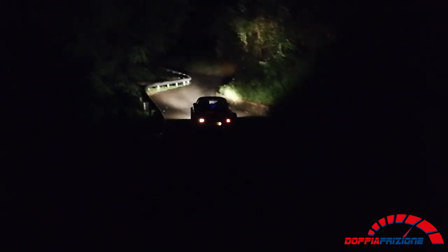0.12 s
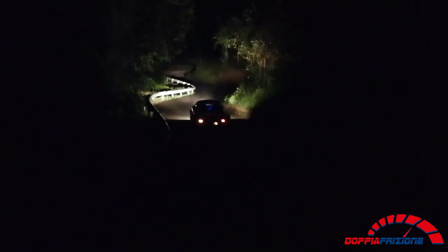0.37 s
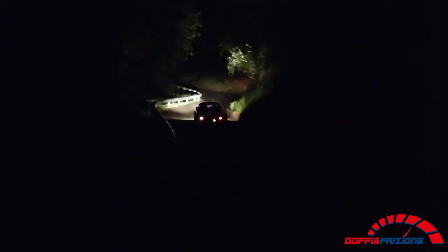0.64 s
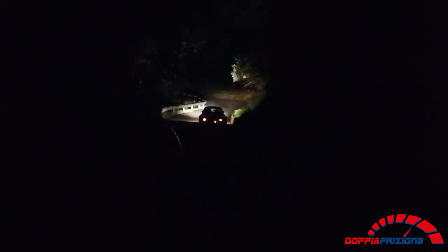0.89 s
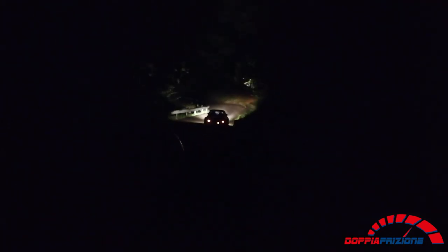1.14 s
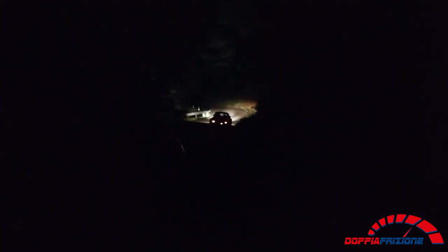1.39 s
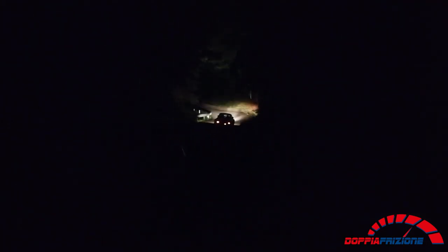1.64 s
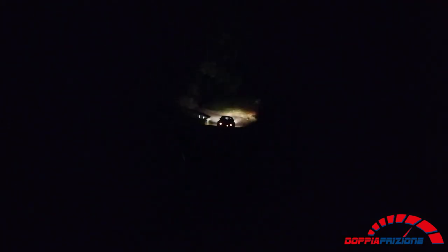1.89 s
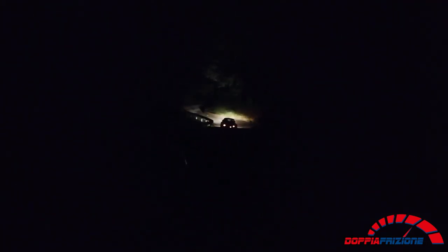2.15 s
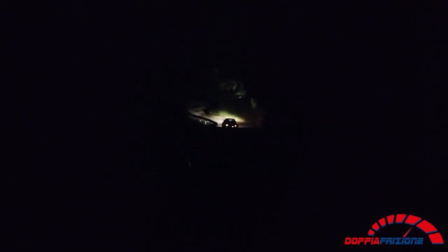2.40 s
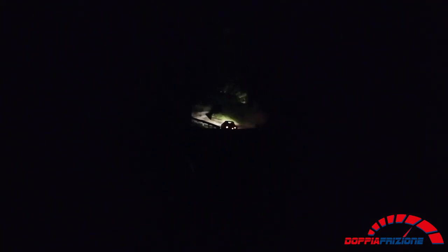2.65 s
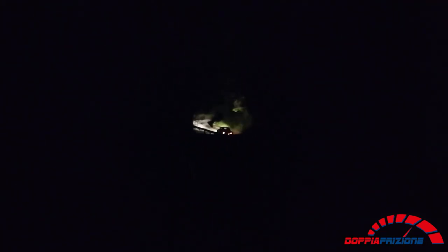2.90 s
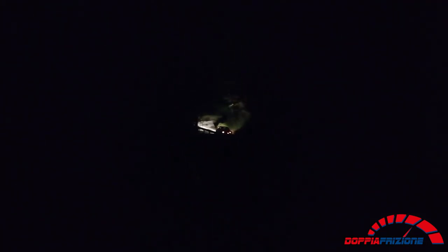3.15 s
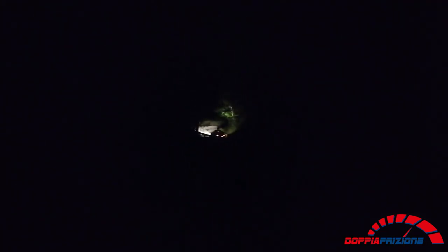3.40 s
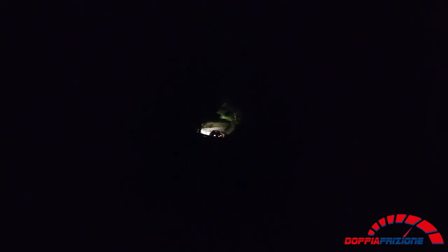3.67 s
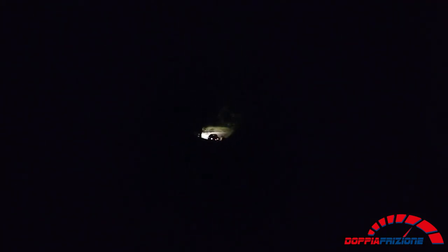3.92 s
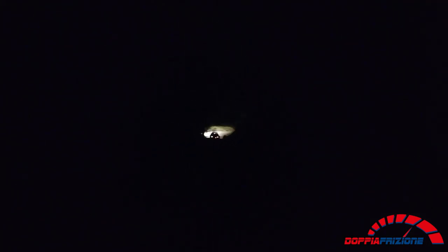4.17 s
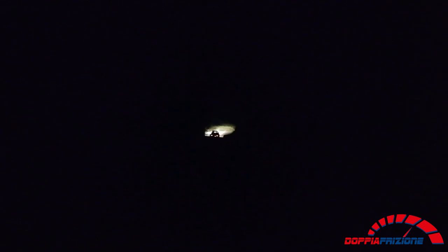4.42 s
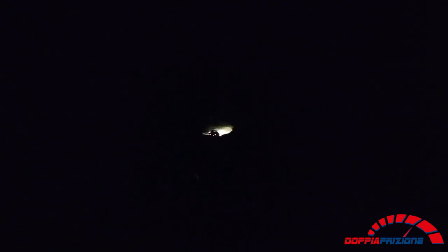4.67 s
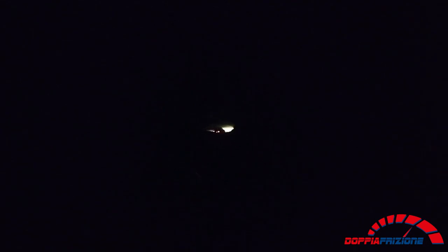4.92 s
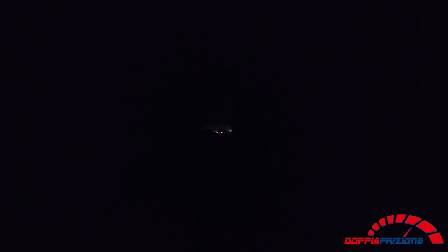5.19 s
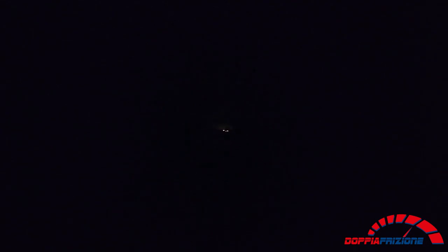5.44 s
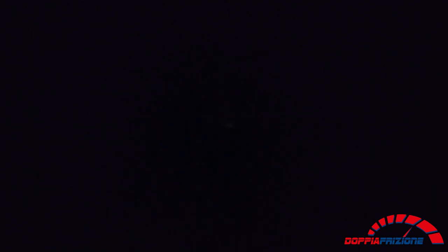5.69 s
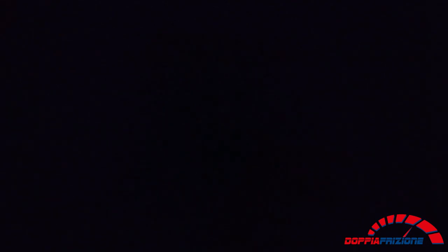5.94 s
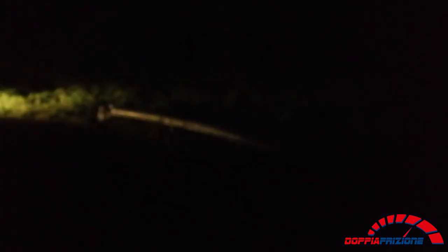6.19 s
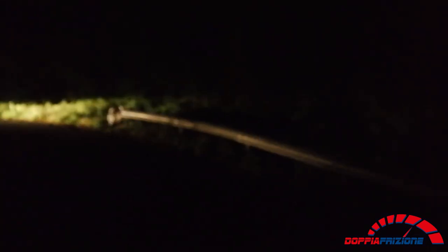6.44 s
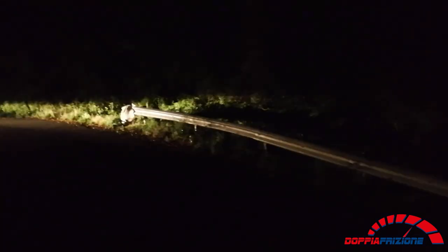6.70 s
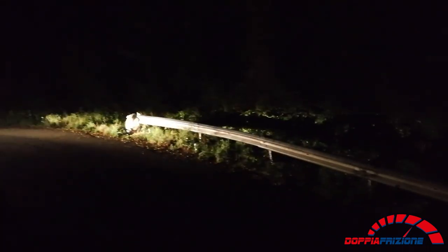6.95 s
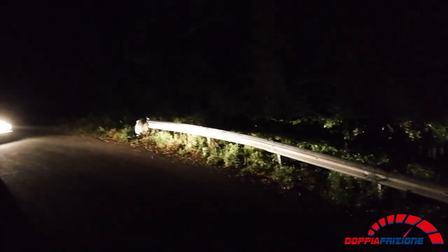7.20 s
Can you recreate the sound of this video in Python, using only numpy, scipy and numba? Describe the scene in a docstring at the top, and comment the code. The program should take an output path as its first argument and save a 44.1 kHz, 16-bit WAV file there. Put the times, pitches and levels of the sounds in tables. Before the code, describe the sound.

Heard in stereo from the roadside: a rasping six-cylinder climbs in revs while driving off, bumps over something low, then lifts into a hollow, barking steady note. Getting quieter, it spits exhaust crackles, gives a quick blip, slows for a bend and picks up faintly. The sound stops dead for half a second. Another car then arrives on the overrun, low engine hum under rising tyre noise, with one faint high chirp.

```python
"""A six-cylinder rally car pulls away up a wooded road, over a low thump early on, lifts, holds, crackles,
blips and brakes for a bend, and pulls again: low order sines, clicks ringing in a pipe and noise puffs.
After half a second of silence a second car rolls up on the overrun: low order sines under growing tyre
roar (filtered noise), with one short whistle. Two microphones hear each car directly and by echoes."""
import sys
import numpy as np
from scipy import signal
from scipy.fft import rfft, irfft, next_fast_len
from scipy.io import wavfile
from scipy.ndimage import uniform_filter1d, map_coordinates
from numba import njit

SR = 44100
rng = np.random.default_rng(int(sys.argv[2]) if len(sys.argv) > 2 else 0)


def persist_wave(psi):
    """Save psi, clipped to +-1, as 16-bit WAV."""
    counts = np.round(np.clip(psi, -1, 1) * 32767).astype(np.int16)
    wavfile.write(sys.argv[1], SR, np.atleast_2d(counts).T)


def ratio_of_db(decibels):
    """Turn decibels (scalar or array-like) into linear amplitude factors; 0 dB maps to 1."""
    return 10 ** (np.asarray(decibels, float) / 20)


N = 323253
SILENT_FROM_S, SILENT_TO_S = 5.963, 6.4833

# leaving car: (time [s], engine cycles [1/s], firing tone before throb [dB])
REVS = [(0.0, 31.0, -11), (0.6, 34.4, -16.5), (0.88, 36.8, -17), (1.13, 39.1, -29), (1.31, 40.8, -28),
        (1.43, 38.0, -44), (1.55, 41.4, -23), (1.68, 38.9, -23), (1.79, 39.9, -22), (2.1, 38.9, -22),
        (2.24, 37.2, -24), (2.38, 39.6, -23), (2.48, 37.5, -22), (2.66, 38.0, -23), (3.46, 36.1, -28),
        (4.37, 32.7, -40), (4.71, 32.4, -41), (4.75, 33.0, -33), (4.83, 32.6, -33), (4.88, 31.4, -46),
        (4.97, 30.8, -44), (5.22, 30.4, -46), (5.36, 28.8, -46), (5.5, 30.0, -50), (5.56, 34.3, -31),
        (5.65, 35.0, -29), (5.7, 33.0, -37), (5.77, 30.4, -25), (5.86, 32.6, -29), (5.96, 35.7, -33)]
# its exhaust: (time [s], loudness [dB], rasp beside loudness [dB])
EFFORT = [(0.0, -28, -7), (0.26, -28, -16.5), (0.66, -21, -13.5), (0.9, -21.5, -13), (1.26, -18, -12),
          (1.36, -22, -7.5), (1.86, -22.5, -4), (2.34, -22.5, -7), (2.59, -24.5, -3), (2.9, -23, -6),
          (3.12, -25.5, -2.5), (3.78, -29.5, -5.5), (4.38, -33, -6), (4.63, -35, -3.5), (4.7, -36, -6),
          (4.83, -36.5, -4), (4.9, -38, 7), (5.02, -32, 0), (5.38, -30.5, -4), (5.46, -28.5, -0.5),
          (5.66, -33, -20), (5.76, -44.5, -6.5), (5.96, -41.5, -14.5)]
# what the driver does, states blended from row to row: (time [s], state)
DRIVING = [(0.0, "pull"), (1.36, "pull"), (1.42, "lift"), (1.5, "lift"), (1.62, "hold"), (2.9, "hold"),
           (4.35, "lift"), (4.68, "lift"), (4.72, "blip"), (4.84, "blip"), (4.89, "brake"), (5.5, "brake"),
           (5.54, "pull"), (5.69, "pull"), (5.73, "hold"), (5.84, "hold"), (5.91, "pull"), (5.97, "pull")]
# start levels per state: (order 3 [dB], order 4 [dB], 5 [dB], 8 [dB], 9 [dB], 10 [dB], 12 [dB])
SIDE_ORDERS = {"pull": (-36, -37, -35.5, -51, -28, -40.5, -28),
               "lift": (-81, -24, -67, -35.5, -39.5, -32, -44.5),
               "hold": (-62, -36.5, -63.5, -43.5, -42.5, -36.5, -40),
               "brake": (-65, -34, -33, -26.5, -32, -33.5, -35),
               "blip": (-34, -28.5, -40, -28.5, -26.5, -49, -59.5)}
# exhaust per state: (bark beside loudness [dB], howl beside loudness [dB], rumble at start [dB])
PIPE = {"pull": (-4, 0.95, -31), "lift": (-1.7, 0, -37), "hold": (-1.4, -0.32, -40.5),
        "brake": (-1.1, 0.13, -33), "blip": (-0.5, 0.075, -26.5)}
# turbulence per state: (rms beside the pulses [ratio],)
TURBULENCE = {"pull": (.8,), "lift": (.22,), "hold": (.12,), "brake": (.28,), "blip": (.9,)}
# unequal header pipes, one row per cylinder: (strength [dB], lateness [firing intervals])
CYLINDERS = [(6.0, -0.0075), (-3, 0.042), (1.5, -0.048), (0.5, 0.1), (-2.5, -0.052), (-1.5, 0.0031)]
# firing tone beats with its echo: (rate [1/s], first swell [s], depth at start [dB], fade [s])
THROB = (4.7, .09, 4.5, .9)
# the pipe cancels orders that cross this band: (frequency [Hz], gain [dB])
DARK_BAND = [(390, 0), (420, -14), (462, -14), (488, 0)]
# strongest bark resonance, moves as the tailpipe turns: (time [s], centre [Hz], gain [dB])
BARK_PATH = [(0.0, 646, -28), (0.38, 477, -7), (0.95, 530, -19.5), (1.03, 690, 5), (1.35, 800, 0),
             (1.45, 583, 19), (1.56, 643, 9.5), (1.72, 620, 19.5), (1.8, 607, -4), (2.45, 500, 3.5),
             (2.9, 677, 4.5), (3.6, 600, 4), (3.7, 563, 5), (3.82, 557, 8), (4.15, 580, -0.5),
             (4.4, 487, 27), (4.7, 520, 13.5), (4.8, 653, 22), (4.9, 600, -19), (5.0, 542, 22),
             (5.5, 570, 14.5), (5.7, 635, -3), (5.96, 636, -3.5)]
# standing pipe resonances: (centre [Hz], width [Hz], gain [dB])
BARK = [(532.5, 26.4, 7.5), (674.6, 57, 2.5), (749, 120, -3.5)]
HOWL = [(1038, 109, -0.5), (1950, 380, -27.5)]
# outline of the rasp, also of the cracks: (frequency [Hz], relative density [dB])
RASP = [(1350, -25.5), (2300, -5.5), (2750, -13.5), (3100, 0), (3740, -2), (4270, 0.5), (5540, -12.5),
        (6180, -3), (7010, -4.5), (8590, -16), (10300, -9.5), (11800, -23.5), (13700, -28.5), (15000, -68)]
# rasp top opens and dulls as the car turns and hides: (time [s], gain [dB])
TOP = [(4.4, -4.5), (4.48, 7.5), (4.64, 1), (4.69, -19), (4.85, -10), (4.9, -11), (5.48, -13), (5.58, -11),
       (5.96, -5)]
# exhaust dips at a gear change: (time [s], gain [dB], 1/e half-length [s])
CUTS = [(1.396, -4, 0.024)]
# part of the exhaust swells: (time [s], centre [Hz], added gain [dB], 1/e half-length [s])
SWELLS = [(1.438, 1500, 8.5, 0.059), (1.24, 470, 1.5, 0.086), (3.49, 610, 3, 0.5),
          (3.064, 3300, -0.5, 0.16), (3.75, 950, 4, 0.04), (3.945, 1570, 3.5, 0.24), (5.13, 596, 1.5, 0.28),
          (5.3, 2250, 5.5, 0.23)]
# one cylinder cracks every cycle, in bursts: (first [s], last [s], level [dB], spread [dB])
CRACKLE = [(4.163, 4.36, -26, 2.5), (4.46, 4.66, -22.5, 2.5), (4.88, 5.33, -28, 3.0),
           (5.544, 5.55, -26, 0.5)]
# bump in the road: (time [s], level [dB], frequency [Hz], 1/e length [s])
THUMP = (.245, -21, 110, .035)
# arriving car: (time [s], engine cycles [1/s], order 3 [dB], order 5 [dB], order 6 [dB], order 9 [dB])
ARRIVING = [(6.49, 26, -28.5, -51, -67.5, -47.5), (6.57, 29, -30.5, -37.5, -37.5, -50),
            (7.33, 27.3, -25, -41, -37, -31.5)]
# its weak orders: (order, level beside -30 dB [dB])
WEAK_ORDERS = [(8, -19), (12, -17.5)]
# its tyres: (time [s], roar [dB], hiss gain [dB])
TYRES = [(6.49, -33, -15), (6.65, -33, -10), (7.0, -32, -1), (7.33, -28.5, -5.5)]
# short high whistle: (time [s], frequency [Hz], level [dB], 1/e length [s])
CHIRP = (6.972, 9450, -37, .035)
# noise outlines: (frequency [Hz], relative density [dB])
ROAR = [(210, -30.5), (350, -16.5), (527, -7.5), (588, -17), (677, -9.5), (780, -8.5), (1050, 1),
        (1510, -4.5), (1710, -11.5), (4470, -20), (9510, -18.5), (15000, -63)]
RUMBLE = [(20, -37), (40, -15), (80, -10), (200, -3), (400, -9.5), (600, -65.5)]
# microphones: (frequency [Hz], left over right [dB])
LEFT_OVER_RIGHT = [(60, 0), (200, 0), (380, 1), (700, 2.5), (1400, -3.5), (2800, -1), (5500, 2.5),
                   (14000, 7)]
# banks and trees: (frequency [Hz], echoes beside direct sound [dB])
SCATTER = [(100, -24), (220, -24), (350, -6), (700, -8), (1500, -8), (3000, -2), (8000, -1), (14000, 4)]

RECEDE_DB_PER_S = 2.5   # side orders, tyre roar and rumble sink as the car draws away
BARK_YIELD = 0.42   # bark loss per rasp gain [dB per dB]
BARK_WIDTH_HZ, BARK_WANDER = 49, 0.015   # wander as a share of the centre
HOWL_START_HZ, HOWL_WIDTH_HZ, HOWL_SLIDE_PER_S, HOWL_WANDER = 1480, 407, 0.014, 0.04
RASP_DB = 5   # added to loudness and edge
ROAD_START_DB = -33
OVERLOAD = 1.1   # height at which peaks saturate


def leaving():
    """Low orders and piped exhaust, then swells, over road noise that sinks steadily."""
    t = np.arange(N) / SR
    rate, firing_db = in_time(REVS)
    cycles = np.cumsum(rate) / SR
    loud_db, edge_db = in_time(EFFORT)
    for s, db, length_s in CUTS:
        loud_db = loud_db + db * np.exp(-((t - s) / length_s) ** 2)
    bark_share_db, howl_share_db, rumble_db = by_state(PIPE)
    bark_db = loud_db + bark_share_db - BARK_YIELD * (edge_db - np.mean(EFFORT, axis=0)[2])
    rasp_db = loud_db + edge_db + RASP_DB + 1.72 * drift(21.88)
    recede_db = RECEDE_DB_PER_S * t

    breath = pipe_breath(cycles)
    out = low_orders(cycles, firing_db, recede_db)
    out = out + ratio_of_db(bark_db) * bark(breath)
    out = out + ratio_of_db(loud_db + howl_share_db) * howl(breath)
    out = swell(out + ratio_of_db(rasp_db) * rasp(cycles))
    # road noise darker than the roar outline
    out = out + ratio_of_db(ROAD_START_DB - recede_db) * noise(ROAR, 1.3)
    return out + ratio_of_db(rumble_db - recede_db) * noise(RUMBLE)


def low_orders(cycles, firing_db, recede_db):
    """Engine orders as sines; the sixth, one cycle per firing, throbs against its echo."""
    t = np.arange(N) / SR
    per_s, first_s, depth_db, fade_s = THROB
    throb_db = depth_db * np.exp(-t / fade_s) * np.cos(2 * np.pi * per_s * (t - first_s))
    side_db = np.array(by_state(SIDE_ORDERS)) - recede_db
    levels_db = [firing_db + throb_db, *side_db]
    return colour(tones(cycles, (6, 3, 4, 5, 8, 9, 10, 12), levels_db), DARK_BAND)


def pipe_breath(cycles):
    """Firing pulses and turbulence with near echoes: what excites the pipe."""
    pulses = rms_one(firings(cycles, jitter=0.008, spread_db=1.2))
    rough, = by_state(TURBULENCE)
    return bank_echoes(pulses + rough * rng.standard_normal(N))


def bark(breath):
    """One moving and three standing pipe resonances, levelled."""
    hz, gain_db = in_time(BARK_PATH)
    hz = hz * (1 + BARK_WANDER * drift(6.2))
    ringing = ratio_of_db(gain_db) * moving(breath, hz, BARK_WIDTH_HZ)
    ringing = ringing + resonances(breath, BARK, wander_db=2.0)
    broad = moving(ringing, np.full(N, 620.0), 600)
    # the pipe is dark just under its bark
    above = signal.butter(8, 485, "high", fs=SR, output="sos")
    return even(signal.sosfilt(above, broad))


def howl(breath):
    """Band-limited breath and noise ring in sliding and standing resonances, levelled."""
    t = np.arange(N) / SR
    hz = HOWL_START_HZ * (1 + HOWL_SLIDE_PER_S * t + HOWL_WANDER * drift(4.5))
    band = signal.butter(2, [800, 4500], "band", fs=SR, output="sos")
    blown = signal.sosfilt(band, breath + 0.4 * rng.standard_normal(N))
    return even(moving(blown, hz, HOWL_WIDTH_HZ) + resonances(blown, HOWL, wander_db=2.0))


def rasp(cycles):
    """Noise swelled by a puff at each firing; distance and trees dull its top."""
    fade = np.exp(-1 / (0.001 * SR))   # about 1 ms
    puffs = signal.lfilter([0.15], [1, -0.85], firings(cycles, jitter=0.05, spread_db=3.0))
    puffs = rms_one(signal.lfilter([1], [1, -fade], puffs))
    hiss = even(colour(rng.standard_normal(N) * (1 + 2.0 * puffs), RASP))
    top = hiss - lowpass(hiss, 3, 5300)
    top_db = in_time(TOP)[0] + 0.73 * drift(20.0)
    return hiss + (ratio_of_db(top_db) - 1) * top


def swell(x):
    """Brief bell-shaped additions of a resonant band."""
    t = np.arange(N) / SR
    for s, hz, db, length_s in SWELLS:
        bell = np.exp(-((t - s) / length_s) ** 2)
        x = x + ratio_of_db(db) * bell * moving(x, np.full(N, float(hz)), 0.12 * hz)
    return x


def firings(cycles, jitter, spread_db):
    """One click per firing; strength and timing set by cylinder and a little chance."""
    count = np.arange(1, int(6 * cycles[-1]) - 1)
    strength_db, late = np.array(CYLINDERS)[count % 6].T
    time_luck, size_luck = rng.standard_normal((2, len(count))).clip(-2, 2)
    due = count + late + jitter * time_luck
    at = np.interp(due, 6 * cycles, np.arange(N - 0.)).clip(0, N - 2)
    size = ratio_of_db(strength_db + spread_db * size_luck)
    # share each click between its two nearest samples
    whole = at.astype(int)
    clicks = np.zeros(N)
    clicks[whole] = size * (1 - at + whole)
    clicks[whole + 1] = size * (at - whole)
    return clicks


def bank_echoes(x):
    """Three near echoes off road and bank slide in delay, so single harmonics swell and fade."""
    at, out = np.arange(N), x
    for lag_s in (0.004, 0.011, 0.019):
        out = out + 0.28 * np.interp(at - SR * (lag_s + 0.0007 * drift(1.6)), at, x)
    return out


def pops():
    """Cracks: noise of rasp colour decaying in 2 ms; lower and upper half vary apart."""
    clicks = np.zeros((2, N))
    for first_s, last_s, db, spread_db in CRACKLE:
        rate = np.interp(first_s, *np.transpose(REVS)[:2])
        s = np.arange(first_s, last_s, 1 / rate)
        luck = rng.standard_normal((2, len(s))).clip(-2, 2)
        clicks[:, (s * SR).astype(int)] = ratio_of_db(db + spread_db * luck)
    fade = np.exp(-1 / (0.002 * SR))
    hiss = noise(RASP)
    low = lowpass(hiss, 3, 5300)
    envelopes = signal.lfilter([1], [1, -fade], clicks + 1e-18)
    return np.sum([low, hiss - low] * envelopes, axis=0)


def thump():
    """Low cosine under a bell envelope."""
    s, db, hz, length_s = THUMP
    t = np.arange(N) / SR - s
    return ratio_of_db(db) * np.exp(-(2 * t / length_s) ** 2) * np.cos(2 * np.pi * hz * t)


def arriving():
    """Low orders on the overrun under growing tyre roar and steady rumble."""
    rate, *levels_db = in_time(ARRIVING)
    orders = [3, 5, 6, 9]
    for order, db in WEAK_ORDERS:
        orders.append(order)
        levels_db.append(-30 + db)
    drone = tones(np.cumsum(rate) / SR, orders, levels_db)
    return drone + tyre_roar() + ratio_of_db(-33.5) * noise(RUMBLE) + chirp()


def tyre_roar():
    """Coloured, wavering noise whose roar and hiss follow the tyre table."""
    roar_db, hiss_db = in_time(TYRES)
    roar = noise(ROAR) * ratio_of_db(1.2 * drift(14.0))
    top = roar - lowpass(roar, 2, 3500)
    return ratio_of_db(roar_db) * (roar + (ratio_of_db(hiss_db) - 1) * top)


def chirp():
    """Soft-edged high sine with wandering phase."""
    s, hz, db, length_s = CHIRP
    t = np.arange(N) / SR - s
    tone = np.sin(2 * np.pi * hz * t + 2.5 * drift(45.0))
    return ratio_of_db(db) * np.exp(-(2 * t / length_s) ** 2) * tone


def roadside(x, left_lead):
    """Left hears left_lead samples early; banks and trees add echoes whose paths slide."""
    at, scattered = np.arange(N), np.zeros((2, N))
    for k in range(8):
        lag = SR * (rng.uniform(0.003, 0.05) + 0.0004 * drift(0.8))
        scattered[k % 2] += np.interp(at - lag, at, x) * ratio_of_db(3.5 * drift(3.0)) / 2
    direct = np.array([x[np.clip(at + left_lead, 0, N - 1)], x])
    # offset the power that the echoes add
    makeup = [(hz, -10 * np.log10(1 + ratio_of_db(db) ** 2)) for hz, db in SCATTER]
    left, right = colour(direct + colour(scattered, SCATTER), makeup)
    return np.array([colour(left, LEFT_OVER_RIGHT, 0.5), colour(right, LEFT_OVER_RIGHT, -0.5)])


def tones(cycles, orders, levels_db):
    """Engine orders as sines, slightly wavering in level and phase."""
    out = 0
    for order, db in zip(orders, levels_db):
        waver = ratio_of_db(1.5 * drift(20.0))
        turns = order * cycles + rng.random() + 0.0097 * drift(3.4)
        out = out + np.sqrt(2) * ratio_of_db(db) * waver * np.sin(2 * np.pi * turns)
    return out


def resonances(x, peaks, wander_db):
    """Parallel resonators of alternating sign; each swells and fades as its level wanders slowly."""
    out = 0
    for k, (hz, width_hz, db) in enumerate(peaks):
        r = np.exp(-np.pi * width_hz / SR)
        pole = [1, -2 * r * np.cos(2 * np.pi * hz / SR), r * r]
        ringing = signal.lfilter([(1 - r * r) / 2, 0, -(1 - r * r) / 2], pole, x + 1e-18)
        out = out + (-1) ** k * ratio_of_db(db + wander_db * drift(3.65)) * ringing
    return out


@njit
def glide(x, angle, r):
    """Two-pole resonator whose centre (radians per sample) moves every sample."""
    out, one, two = np.zeros(len(x)), 0., 0.
    for i in range(2, len(x)):
        drive = (1 - r * r) / 2 * (x[i] - x[i - 2])
        out[i] = drive + 2 * r * np.cos(angle[i]) * one - r * r * two
        one, two = out[i], one
    return out


def moving(x, hz, width_hz):
    """Moving resonance of the given width."""
    return glide(x, 2 * np.pi * hz / SR, np.exp(-np.pi * width_hz / SR))


def colour(x, points, share=1):
    """Filter by a (frequency [Hz], gain [dB]) outline, its dB scaled by share."""
    size = next_fast_len(N + 4096)
    hz, db = np.transpose(points)
    log_hz = np.log(np.maximum(np.arange(size // 2 + 1) * SR / size, 1))
    gain = ratio_of_db(share * np.interp(log_hz, np.log(hz), db))
    return irfft(rfft(x, size) * gain, size)[..., :N]


def noise(points, share=1):
    """Coloured noise of unit rms."""
    return rms_one(colour(rng.standard_normal(N), points, share))


def lowpass(x, order, hz):
    """Zero-phase low-pass."""
    return signal.sosfiltfilt(signal.butter(order, hz, fs=SR, output="sos"), x)


def rms_one(x):
    """Scale to unit rms."""
    return x / np.sqrt(np.mean(x ** 2) + 1e-20)


def even(x):
    """Unit rms over a running 59 ms."""
    return x / np.sqrt(uniform_filter1d(x ** 2, size=2600) + 1e-20)


def drift(per_s):
    """Smooth chance with spread near 1, per_s knots a second."""
    knots = rng.standard_normal(400)
    at = np.arange(0, N + 64, 64)
    curve = map_coordinates(knots, [at / SR * per_s + 2], order=2)
    return np.interp(np.arange(N), at, curve)


def in_time(rows):
    """Each column of a time table at every sample."""
    s, *columns = np.transpose(rows)
    return [np.interp(np.arange(N) / SR, s, c) for c in columns]


def by_state(table):
    """Columns of a state table, blended along the drive."""
    return in_time([(s, *table[state]) for s, state in DRIVING])


def scene():
    """Leaving car, silence, arriving car."""
    t = np.arange(N) / SR
    early = t < (SILENT_FROM_S + SILENT_TO_S) / 2
    cars = np.where(early, leaving() + pops() + thump(), arriving())
    heard = roadside(cars, left_lead=np.where(early, 6, 24))
    return heard * ((t < SILENT_FROM_S) | (t > SILENT_TO_S))


def band_limit(x):
    """A steep low-pass at the top of the band."""
    return signal.sosfilt(signal.butter(12, 15610, fs=SR, output="sos"), x)


def record(dry):
    """Round the peaks and cut the top."""
    rounded = OVERLOAD * np.tanh(dry / OVERLOAD)
    cut = signal.cheby2(10, 60, 15900, fs=SR, output="sos")
    mix = signal.sosfilt(cut, rounded)
    return band_limit(mix)


dry = scene()
out = record(dry)
persist_wave(out)
```